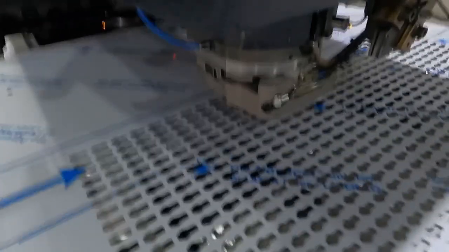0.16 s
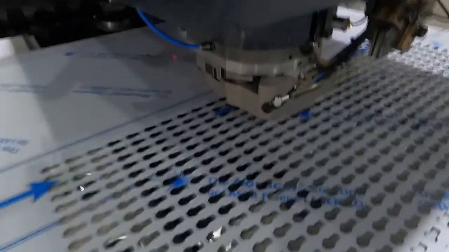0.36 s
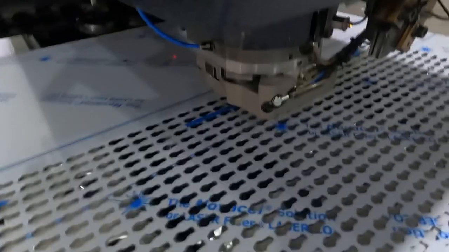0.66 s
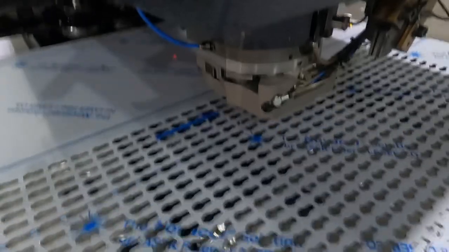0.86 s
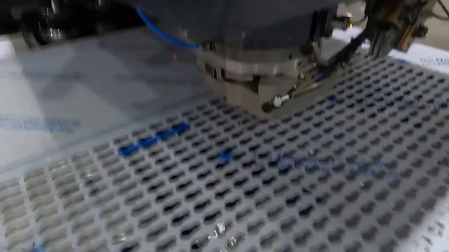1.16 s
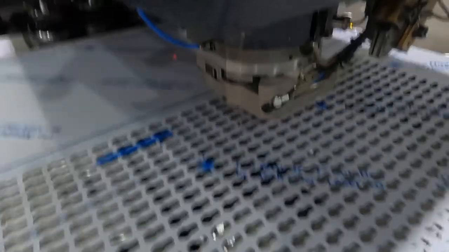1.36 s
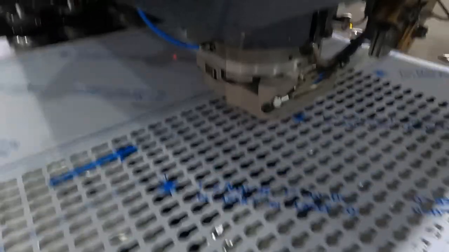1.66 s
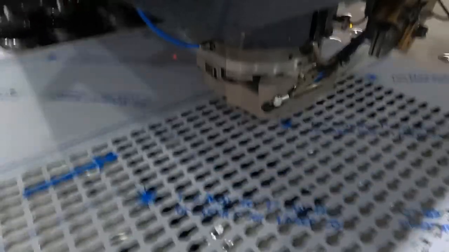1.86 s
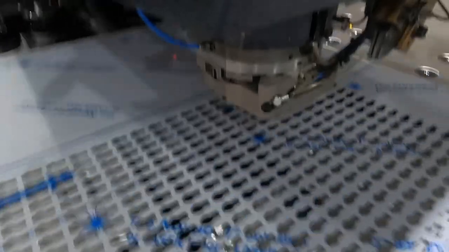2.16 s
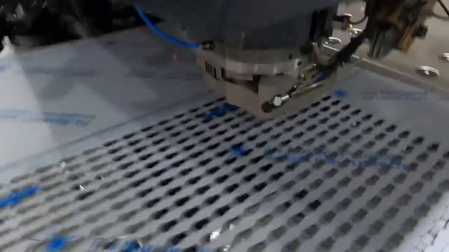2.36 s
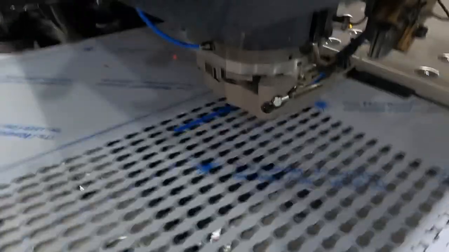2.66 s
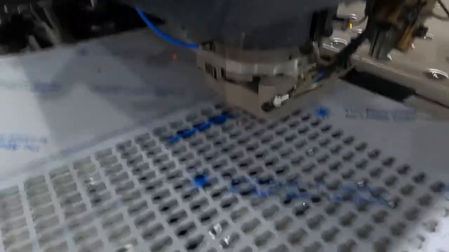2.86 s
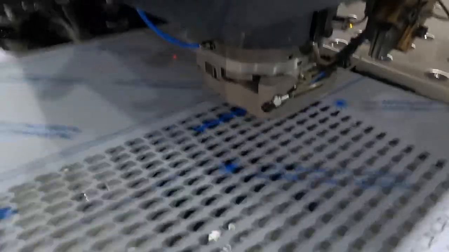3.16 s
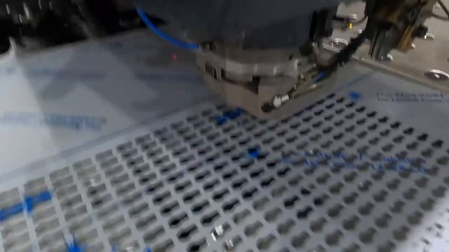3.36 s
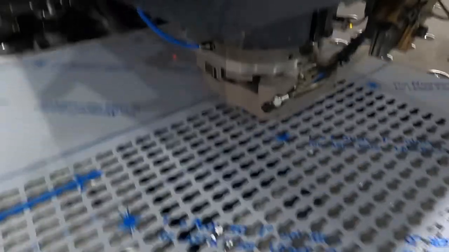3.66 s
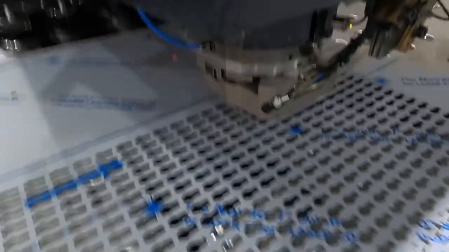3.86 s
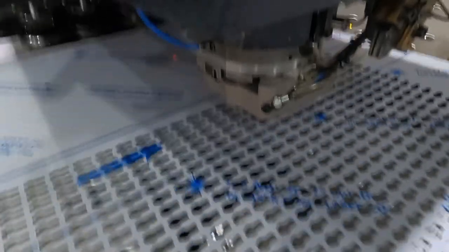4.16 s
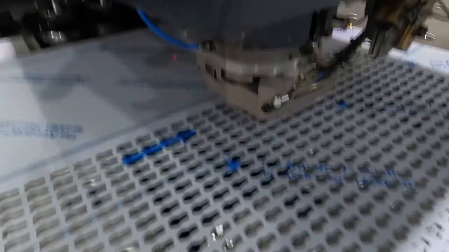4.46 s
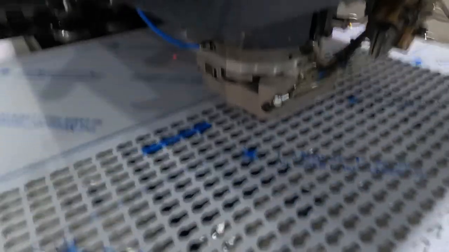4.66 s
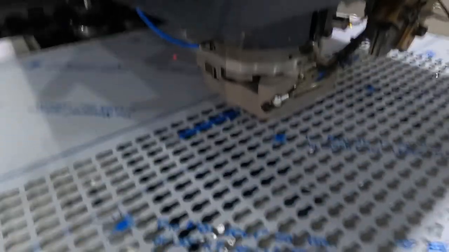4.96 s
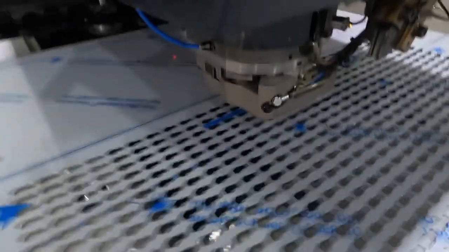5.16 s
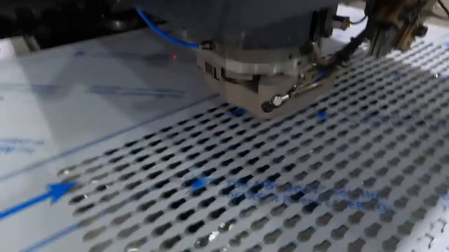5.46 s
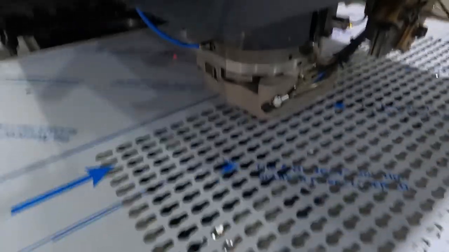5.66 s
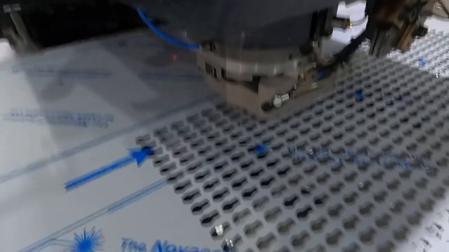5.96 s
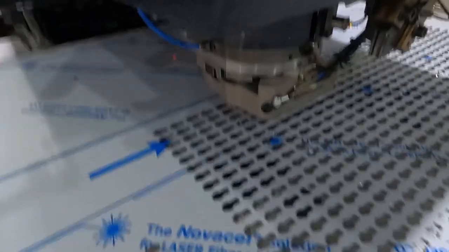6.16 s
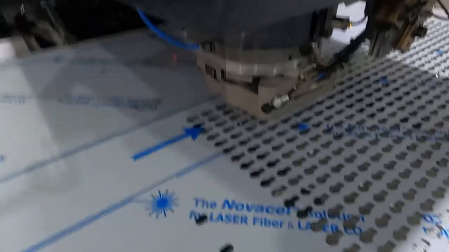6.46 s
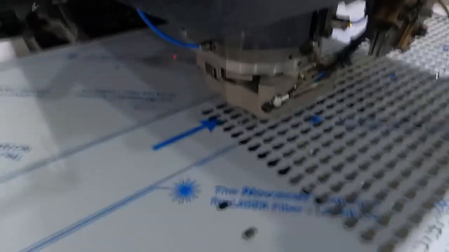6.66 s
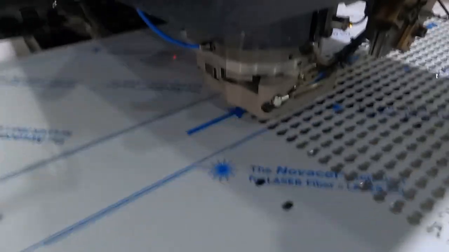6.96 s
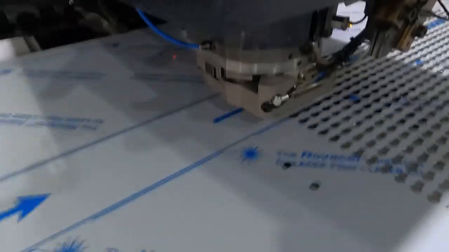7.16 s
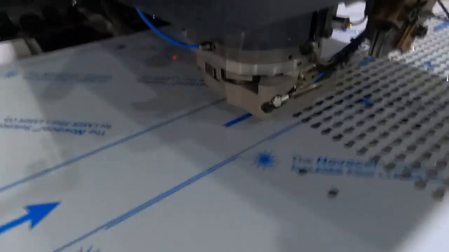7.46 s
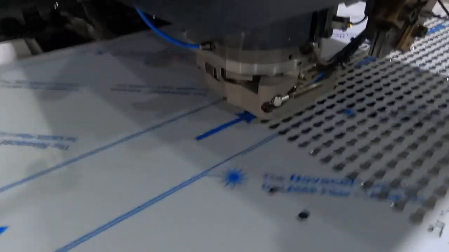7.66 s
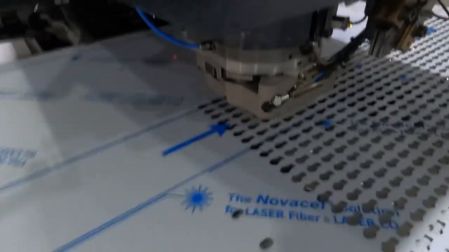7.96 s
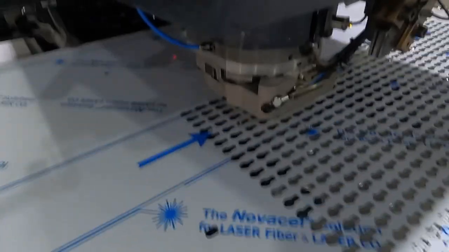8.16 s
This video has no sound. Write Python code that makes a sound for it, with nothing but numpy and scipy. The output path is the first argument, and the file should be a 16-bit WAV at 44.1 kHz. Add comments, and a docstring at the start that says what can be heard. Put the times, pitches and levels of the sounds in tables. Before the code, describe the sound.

Fast mechanical stamping fills a factory hall, heard close in stereo. Low frame thumps, midrange metal knocks and crisp double snaps overlap into a relentless chugging clatter with a short diffuse echo. Broad compressed-air hiss pulses between strokes, and deep rumble stays constant. A distant wavering whine is present at first, then stops and dies away. The beat briefly hesitates twice as the sheet changes rows, then carries straight on.

```python
"""A punch press close by stamps a steel sheet about six and a half times a second, over hiss and hall rumble.
In each stroke a chain of blows rings the press parts as decaying sines, and the slug cracks out in noise bursts.
Air hiss, a coloured noise whose middle and treble swell slowly, and a far-off whine sink after each stroke.
The whine, a sagging sine, wavers from the start, stops near 2.9 s and dies away by 3.5 s.
Near 2.9 and 7.4 s the strokes leave a longer gap as the sheet steps to a new row."""
import sys
import numpy as np
from scipy import signal
from scipy.fft import rfft, irfft, next_fast_len
from scipy.io import wavfile
from scipy.ndimage import uniform_filter1d

SR = 44100
rng = np.random.default_rng(int(sys.argv[2]) if len(sys.argv) > 2 else 0)


def dump_mix(stems):
    """Bounce the given channels to the path in sys.argv[1] as a 16-bit WAV at rate SR."""
    frames = np.atleast_2d(stems).T  # one column per channel
    limited = np.clip(frames, -1, 1)  # hard clip at full scale
    pcm = np.round(limited * 32767).astype(np.int16)
    wavfile.write(sys.argv[1], SR, pcm)


N = 366030
LEAD = SR  # samples before time zero, so that earlier strokes still ring

# Strokes, with a longer gap at each new row: (time [s], crack drive [dB], tool knock [dB])
STROKES = [(-0.078, -23.4, 0.0), (0.0752, -23.3, 0.0), (0.2294, -23.7, -1.0), (0.381, -25.2, -0.8),
           (0.5354, -23.0, -0.3), (0.6864, -25.0, 0.0), (0.8405, -24.7, -0.6), (0.9948, -24.6, 1.2),
           (1.1469, -23.3, -1.8), (1.2992, -22.2, -2.1), (1.4533, -23.8, -2.2), (1.6079, -23.0, 0.3),
           (1.7615, -22.0, -0.6), (1.9179, -21.4, -1.2), (2.0715, -21.8, -1.3), (2.2231, -24.3, -1.8),
           (2.3752, -25.3, 0.0), (2.5276, -24.2, 0.0), (2.6797, -22.6, -0.1), (2.8353, -20.9, 0.0),
           (3.0173, -22.8, -1.0), (3.1717, -25.0, 1.0), (3.3249, -25.0, 0.0), (3.4774, -26.1, 1.3),
           (3.6336, -24.2, 0.8), (3.7892, -24.6, 0.6), (3.9432, -22.4, -1.1), (4.0959, -24.3, 0.8),
           (4.2489, -25.6, 0.4), (4.403, -24.3, 0.1), (4.557, -23.5, 0.3), (4.7118, -25.9, 0.3),
           (4.8649, -24.6, -0.3), (5.0176, -25.9, -0.6), (5.1716, -21.7, 0.1), (5.3254, -25.7, -0.2),
           (5.4791, -25.1, 0.9), (5.6326, -26.1, 0.6), (5.786, -24.4, -0.8), (5.9379, -24.2, -0.6),
           (6.0922, -27.6, 0.2), (6.2456, -25.1, 0.4), (6.4023, -26.4, 0.1), (6.5552, -26.8, 0.7),
           (6.7078, -26.3, -0.2), (6.858, -25.6, -0.7), (7.0119, -26.5, 0.4), (7.1658, -26.8, 0.6),
           (7.3215, -25.1, 1.8), (7.5034, -25.1, 1.5), (7.6553, -26.9, -0.3), (7.8076, -27.6, 0.1),
           (7.9617, -24.3, 1.0), (8.1159, -25.2, 0.2), (8.2705, -23.4, 0.0)]
STROKE_S = 0.1535  # usual time per hole

# Blows that each part takes in one stroke: (time after the stroke [ms], strength [dB], direction [+1 or -1])
FRAME_BLOWS = [(-39.3, -9.4, 1), (-2.4, 0, 1), (42.44, -2.9, -1), (69.96, -1, 1)]
RAM_BLOWS = [(-8.42, -8.6, 1), (-2.93, -18.6, 1), (31.44, 0.0, -1), (64.36, -8.6, 1), (101.36, -2.6, 1)]
BED_BLOWS = [(2.16, -12.5, 1), (9.89, -2.0, 1), (17.08, -3.1, -1), (42.71, 0.0, 1), (83.8, -3.2, -1),
             (91.83, -0.9, -1)]
TABLE_BLOWS = [(-6.37, 0.0, 1), (16.99, -3.3, -1), (35.72, -2.5, -1), (65.94, -8.4, 1), (98.13, -5.2, -1)]
TOOL_BLOWS = [(-7.83, -4.1, -1), (0.51, -2.9, -1), (8.22, -2.3, 1), (10.55, -4.8, 1), (22.37, 0.0, 1),
              (39.49, -7.7, -1), (96.28, -8.1, -1)]
DIE_BLOWS = [(-9.98, -1.3, -1), (9.51, 0.0, -1), (11.42, -2.1, -1), (20.04, -13.9, 1), (25.19, -5.1, -1)]

# Ringing modes of each part: (frequency [Hz], level [dB], time to fall 60 dB [s], sense at the ear [+1 or -1])
FRAME_MODES = [(47.2, -21, .6, 1), (56, -20.5, .55, 1), (65.9, -11.3, .11, -1), (90.6, -18, .6, 1),
               (103.6, -11.7, .11, -1), (121.4, -27.5, .63, 1)]
RAM_MODES = [(150.2, -23.2, 0.42, 1), (162.0, -21.6, 0.36, -1), (184.4, -27.4, 0.62, 1),
             (201.6, -29, 1.0, 1), (228.0, -37, 1.0, 1)]
BED_MODES = [(235.2, -32, 0.08, -1), (267.4, -26.5, 0.27, -1), (288.3, -22.6, 0.25, -1),
             (313.4, -26.5, 0.8, -1), (333.8, -26.5, 0.23, 1), (354.3, -37.9, 0.32, 1)]
TABLE_MODES = [(402.7, -41.4, 0.98, -1), (420.7, -37, 0.23, 1), (453.0, -36, 0.32, -1),
               (499.2, -28.9, 0.21, -1), (506.4, -31.8, 0.86, 1)]
TOOL_MODES = [(546.4, -24.4, 0.19, 1), (592.3, -25.3, 0.3, 1), (603.1, -25.5, 0.08, 1),
              (690, -30.5, 0.45, -1)]
DIE_MODES = [(759.1, -37, 0.21, -1), (861.8, -34.4, 0.2, 1), (914.0, -43.6, 0.22, 1),
             (974.1, -40.2, 0.37, 1), (1035.6, -51.2, 0.46, -1)]

# Trim of the blows on frame, ram, bed, table, tool, die: (level [dB])
PART_TRIM = [0.11, 0.033, 0.2, 0.1, 0.083, 1]
# Contact setting for the same parts, heavier ones pushed more softly: (time [ms])
PART_CONTACT = [3, 1.5, 1, .6, .45, .25]
FRAME_SCATTER_DB = 0.3  # stroke to stroke
# Ram and bed ring fuller as the sheet travels: (time [s], level [dB])
RAM_BED_RING = [(0, -0.5), (5.5, -0.06), (7, 1), (8.3, 2)]
# Frame balance as the sheet travels, added to the upper modes and taken off the lower: (time [s], level [dB])
FRAME_TILT = [(0, 0), (2.7, -2), (4.5, 0), (6.7, 0.5), (8.3, 1)]

# Rattles of the loose sheet: (time after the stroke [ms], level [dB], time to fall 60 dB [s])
RATTLES = [(-11.5, -34, 0.16), (25.5, -26.5, 0.051), (46.5, -39.5, 0.57)]
# Colour of the sheet's rattle: (frequency [Hz], level [dB])
SHEET_COLOUR = [(450, -26), (600, 10), (800, 0), (1150, 10), (1500, 0), (2200, -4.5), (3200, -8),
                (4200, -30)]

# The slug tears, then drops free: (time after the stroke [ms], level [dB])
SNAPS = [(2.4, -.5), (6.6, -3)]
# Colour of the slug's crack: (frequency [Hz], level [dB])
SNAP_COLOUR = [(2500, 5), (4300, 0.5), (6500, 24), (8000, 18.5), (9500, 9.5), (12000, 14), (13500, 0),
               (15500, -35.5)]

ROOM_T60_S, ROOM_DB = 0.53, -19  # echo decay time, echo gain

# Colour of the air hiss: (frequency [Hz], density [dB per Hz])
AIR_COLOUR = [(1470, -42), (2500, -2), (3050, -1.5), (4860, 6), (5280, 4.5), (6590, 4.5), (7390, 3),
              (8290, -3), (9080, -4.5), (11700, -2), (12400, -6), (14100, -19), (15500, -86)]
AIR_DB = -29  # rms of the mid part before flutter, swells and dip
# Swell of the hiss at 2.5-5.5 kHz: (time [s], level [dB])
AIR_MIDDLE = [(0, 0.5), (1, -0.1), (2, 0), (3, -0.2), (4, 0.5), (4.7, 0.5), (5.4, 1), (6.1, 0), (7, 0),
              (8.3, -.5)]
# Swell of the hiss above 5.5 kHz: (time [s], level [dB])
AIR_TREBLE = [(0, -0.6), (1, 0), (2, 0.5), (2.6, 0.8), (3.5, 1), (4.5, 0.5), (5.6, -0.1), (6.5, -0.5),
              (7.5, -0.2), (8.3, -0.5)]

# Whine before the ear balance and dip: (time [s], rms level [dB])
WHINE_LEVEL = [(0, -29.5), (.45, -29.5), (.9, -31), (1.4, -28), (1.9, -32), (2.2, -27.5), (2.5, -25.5),
               (2.89, -27), (2.94, -37), (3.12, -34), (3.3, -43), (3.5, -49)]
WHINE_HZ, WHINE_SAG_HZ_PER_S = 1374.5, 0.22

# Sinking of hiss and whine around a stroke: (time after the stroke [ms], share of full depth [ratio])
DIP = [(-2, -0.13), (-2, -0.74), (15, -0.47), (24, -0.81), (46, -0.53), (89, -0.26), (122, -0.46),
       (155, -0.42)]

# Bass part of the hall rumble: (frequency [Hz], density [dB per Hz])
HALL_BASS = [(25, -4), (40, -10), (60, -13), (75, -11), (115, -4), (140, -7), (180, -6), (215, -9),
             (255, -3)]
# Whole colour of the hall rumble, bass included: (frequency [Hz], density [dB per Hz])
HALL_COLOUR = HALL_BASS + [(320, -5.0), (400, -10.5), (480, -11.0), (560, -8.5), (650, -10.5), (850, -14.5),
               (1100, -13.0), (2000, -23.0), (3000, -34.5), (4000, -79.0)]
HALL_DB = -26.5  # rms of the mid part

# Stereo width of the noises: (frequency [Hz], side minus mid [dB])
SIDE_WIDTH = [(60, -14), (110, -9), (200, -16), (380, -9), (700, -10), (1290, -10), (2380, -4), (3500, -6),
              (4400, -15.5), (5500, -40), (7000, -14.5), (8800, -26), (10500, -13), (15000, 1)]
# Stereo balance of the whole sound: (frequency [Hz], left minus right [dB])
LEAN = [(40, -4), (60, 3.5), (85, -0.4), (125, 1.3), (200, 0.5), (380, 2.5), (700, 0), (1290, -0.5),
        (2380, 1), (4400, 0), (8120, -0.5), (11000, -3.5), (15000, -4)]
TOP_HZ = 15660  # steep upper limit


def press(strokes_s, tool_db, scatter_db=0.5, scatter_ms=0.04):
    """The blows of every stroke, never quite alike, ring the parts of the press; the loose sheet rattles along."""
    s, tool_db = strokes_s[:, None], tool_db[:, None]
    frame_db = FRAME_SCATTER_DB * rng.standard_normal((len(s), 1))
    ram_db = np.interp(s, *np.transpose(RAM_BED_RING))
    tilt_db = np.interp(s, *np.transpose(FRAME_TILT))
    # modes, blows, level per stroke [dB], place in the part tables
    parts = (
        (FRAME_MODES[:3], FRAME_BLOWS, frame_db - tilt_db, 0),
        (FRAME_MODES[3:], FRAME_BLOWS, frame_db + tilt_db, 0),
        (RAM_MODES, RAM_BLOWS, ram_db, 1),
        (BED_MODES, BED_BLOWS, ram_db, 2),
        (TABLE_MODES, TABLE_BLOWS, frame_db, 3),
        (TOOL_MODES, TOOL_BLOWS, tool_db, 4),
        (DIE_MODES, DIE_BLOWS, frame_db, 5),
    )
    ringing = 0
    for modes, blows, stroke_db, part in parts:
        ms, blow_db, direction = np.transpose(blows)
        luck = rng.standard_normal((len(s), 2, len(ms)))
        blow_db = blow_db + PART_TRIM[part] + stroke_db + scatter_db * luck[:, 0]
        at_s = s + (ms + scatter_ms * luck[:, 1]) / 1000
        push = taps(at_s, np.sign(direction) * undb(blow_db))
        ringing = ringing + ring(soften(push, PART_CONTACT[part]), modes)
    return ringing + sheet_rattle(s)


def sheet_rattle(s):
    """The loose sheet chatters: coloured noise under envelopes that die away after each knock."""
    shake = 0
    for ms, db, t60_s in RATTLES:
        knock_db = db + 1.3 * rng.standard_normal((len(s), 1))
        shake = shake + fade(taps(s + ms / 1000, undb(knock_db)), t60_s)
    return soften(shake, 2) * level(colour(rng.standard_normal(N), SHEET_COLOUR), 0)


def crack(strokes_s, drive_db, scatter_db=0.9, scatter_ms=0.6):
    """The slug shears out in two uneven snaps: bright bursts with a short fizzing tail."""
    ms, snap_db = np.transpose(SNAPS)
    luck = rng.standard_normal((len(strokes_s), 2, len(ms)))
    late_ms = scatter_ms * luck[:, 0] * [0, 1]  # only the second snap wanders in time
    at_s = strokes_s[:, None] + (ms + late_ms) / 1000
    hit_db = drive_db[:, None] + snap_db + scatter_db * luck[:, 1]
    hit = soften(taps(at_s, undb(hit_db)), 0.42)
    burst = undb(-4.5) * fade(hit, 0.011)
    fizz = undb(-9.5) * fade(hit, 0.12)
    return (burst + fizz) * wide_noise(SNAP_COLOUR, 0)


def room(x):
    """Diffuse echo: decaying noise, different in each ear, without the deepest bass."""
    t = np.arange(SR) / SR
    tail = band(rng.standard_normal((2, SR)), 220.0, 7900) * np.exp(-np.log(1000) * t / ROOM_T60_S)
    tail = tail / np.sqrt(np.sum(tail ** 2, axis=1, keepdims=True))
    return undb(ROOM_DB) * signal.fftconvolve(x[None], tail, axes=1)[:, :N]


def air():
    """Compressed air at the die: a broad hiss that flutters a little, its middle and treble swelling slowly."""
    flutter_db = 0.95 * walk(150) + 0.44 * walk(0.68)
    hiss = wide_noise(AIR_COLOUR, AIR_DB) * undb(flutter_db)
    treble = colour(hiss, [(5200, -42), (5800, -3), (7800, 7.5), (10500, -1)])
    middle = colour(hiss, [(2200, -40), (2700, 5), (5000, -2), (5700, -40)])
    return hiss + treble * swell(AIR_TREBLE) + middle * swell(AIR_MIDDLE)


def swell(curve):
    """Share of a band to add or take away as its level curve moves."""
    return undb(np.interp(np.arange(N) / SR, *np.transpose(curve))) - 1


def whine():
    """A distant pure whine that sags slowly in pitch, wavers in level, stops and dies away in the hall."""
    t = np.arange(N) / SR
    ear_db = np.array([[-1.5], [1.5]])  # louder on the right
    db = np.interp(t, *np.transpose(WHINE_LEVEL), right=-90) + ear_db
    cycles = (WHINE_HZ - WHINE_SAG_HZ_PER_S * t / 2) * t
    return np.sqrt(2) * undb(db) * np.sin(2 * np.pi * cycles)


def dip(strokes_s, depth_db):
    """Gain of steady sounds: they sink just after each stroke and swell part of the way back, unevenly."""
    t = np.arange(N) / SR
    begun = np.searchsorted(strokes_s, t + 0.006)  # a stroke counts from 6 ms ahead of it
    latest_s = strokes_s[np.minimum(begun, len(strokes_s)) - 1]
    since_ms = 1000 * (t - latest_s)
    share = uniform_filter1d(np.interp(since_ms, *np.transpose(DIP)), size=100)
    return undb(depth_db * share)


def rumble():
    """The hall's steady rumble: wide noise, strongest in the bass."""
    return wide_noise(HALL_COLOUR, HALL_DB)


def undb(db):
    """Decibels to gain."""
    return 10 ** (np.asarray(db) / 20)


def level(x, db):
    """Scale to an rms level."""
    return x * undb(db) / np.sqrt(np.mean(x ** 2))


def colour(x, table):
    """Filter by (frequency [Hz], level [dB]) points joined on a log frequency axis."""
    hz, db = np.transpose(table)
    size = next_fast_len(N)
    f = np.maximum(np.arange(size // 2 + 1) * SR / size, 1)
    gain = undb(np.interp(np.log(f), np.log(hz), db))
    return irfft(rfft(x, size) * gain, size)[..., :N]


def band(x, lo_hz, hi_hz, order=2):
    """Band-pass."""
    return signal.sosfilt(signal.butter(order, [lo_hz, hi_hz], "band", fs=SR, output="sos"), x)


def walk(rate_hz):
    """Random levels, each held for one period of the rate and smoothed twice; spread near 1."""
    hold = int(SR / rate_hz)
    steps = np.repeat(rng.standard_normal(N // hold + 1), hold)
    return 1.5 * uniform_filter1d(uniform_filter1d(steps, hold), hold)[:N]


def wide_noise(table, db):
    """Coloured noise with an unrelated side part."""
    mid = level(colour(rng.standard_normal(N), table), db)
    side = colour(level(colour(rng.standard_normal(N), table), db), SIDE_WIDTH)
    return np.array([mid + side, mid - side])


def taps(at_s, size):
    """Impulses at the given times, each shared between two samples."""
    out = np.zeros(N + LEAD + 1)
    at = np.ravel(at_s) * SR + LEAD
    keep = at < N + LEAD
    at, size = at[keep], np.ravel(size)[keep]
    k = at.astype(int)
    np.add.at(out, k, size * (1 - at + k))
    np.add.at(out, k + 1, size * (at - k))
    return out[:-1]


def soften(x, contact_ms):
    """Spread each impulse into a rounded push, about 0.7 of the contact setting wide at half height."""
    size = max(int(contact_ms * SR / 1400), 1)
    return uniform_filter1d(uniform_filter1d(x, size=size), size=size)


def ring(x, modes):
    """Decaying sines; each mode first pushes or first pulls the air."""
    t = np.arange(SR) / SR
    body = 0
    for hz, db, t60_s, sense in modes:
        decay = np.exp(-np.log(1000) * t / t60_s)
        body = body + np.sign(sense) * undb(db) * decay * np.sin(2 * np.pi * hz * t)
    return signal.fftconvolve(x, body)[LEAD:LEAD + N]


def fade(x, t60_s):
    """Each impulse becomes an envelope that dies away."""
    return signal.lfilter([1], [1, -np.exp(-np.log(1000) / (t60_s * SR))], x)[LEAD:]


def scene():
    """The press, its echo and the steady sounds around it."""
    first_s, *first_levels = STROKES[0]
    earlier = [(first_s - k * STROKE_S, *first_levels) for k in (4, 3, 2, 1)]  # still ringing at the start
    strokes_s, crack_db, tool_db = np.transpose(earlier + list(STROKES))
    machine = press(strokes_s, tool_db)
    steady = dip(strokes_s, 6.8) * air() + dip(strokes_s, 14.6) * whine() + rumble()
    return machine + room(machine) + crack(strokes_s, crack_db) + steady


def record(dry, gain_db=2.0):
    """Uneven left and right colour, bass cut, soft ceiling, steep top."""
    lean = np.array(LEAN)
    left = colour(dry[0], lean * [1, 0.5])  # each side takes half the difference
    right = colour(dry[1], lean * [1, -0.5])
    bass_cut = signal.butter(4, 31.0, "high", fs=SR, output="sos")
    x = undb(gain_db) * signal.sosfilt(bass_cut, np.array([left, right]))
    limited = np.tanh(0.94 * x) / 0.69
    return signal.sosfilt(signal.ellip(10, 0.2, 80, TOP_HZ, fs=SR, output="sos"), limited)


dry = scene()
out = record(dry)
dump_mix(out)
```